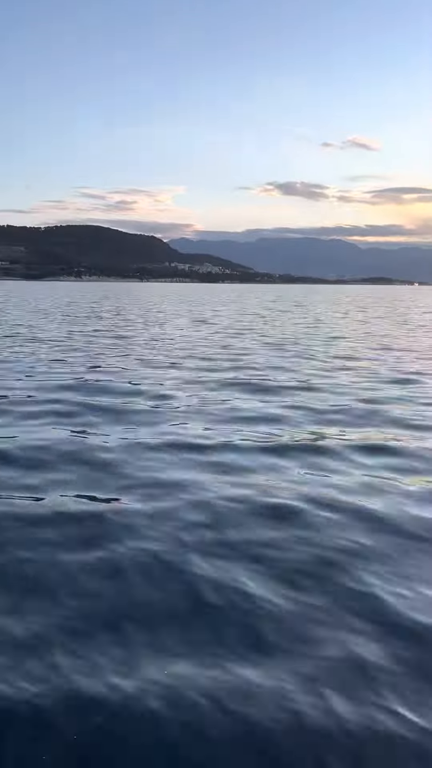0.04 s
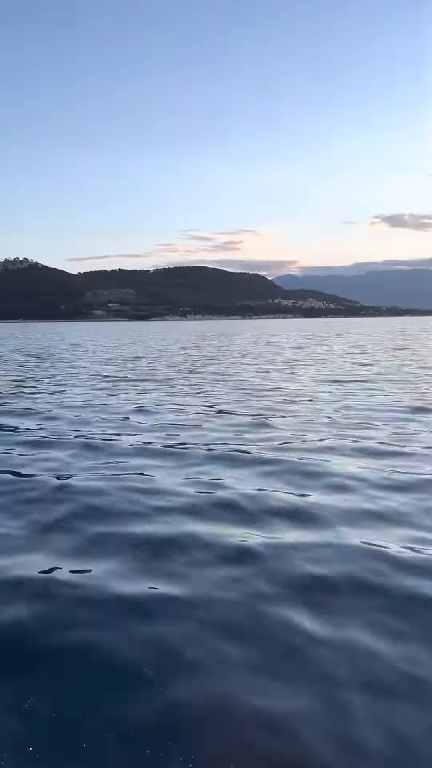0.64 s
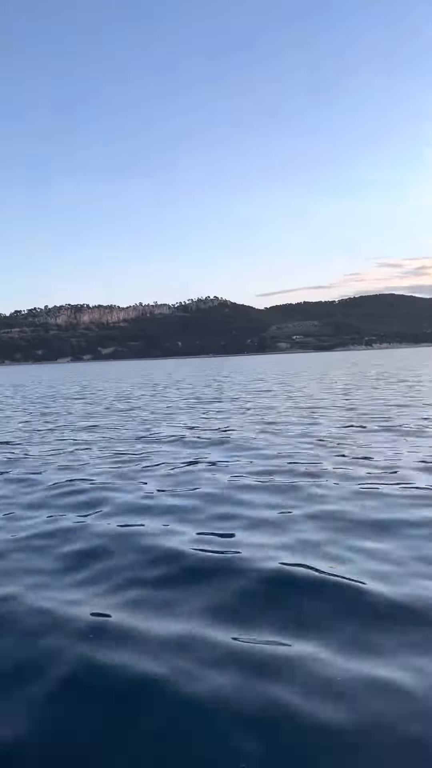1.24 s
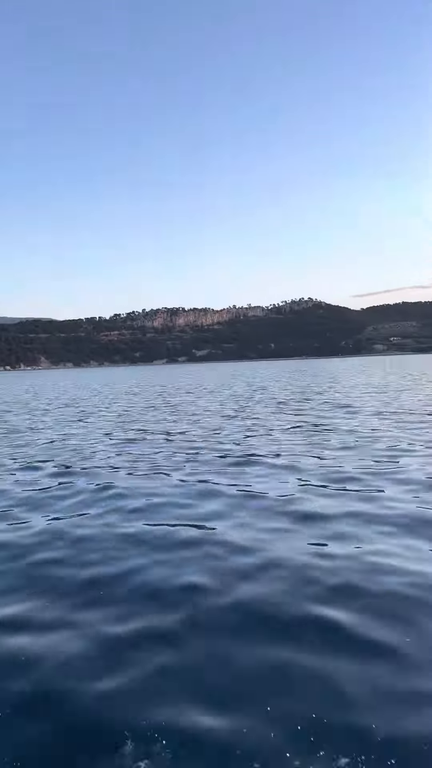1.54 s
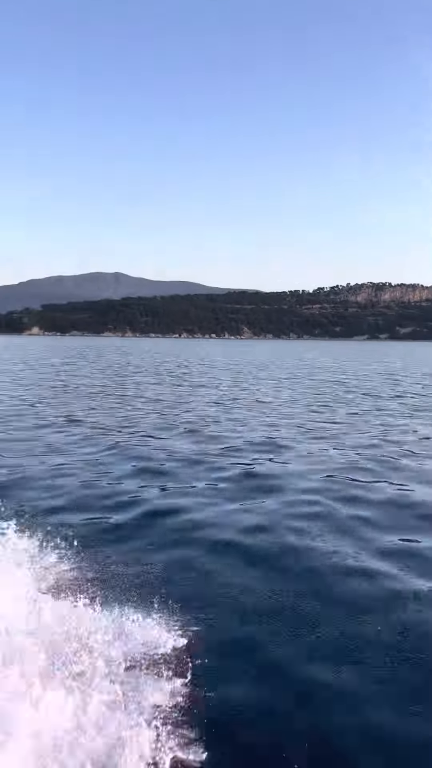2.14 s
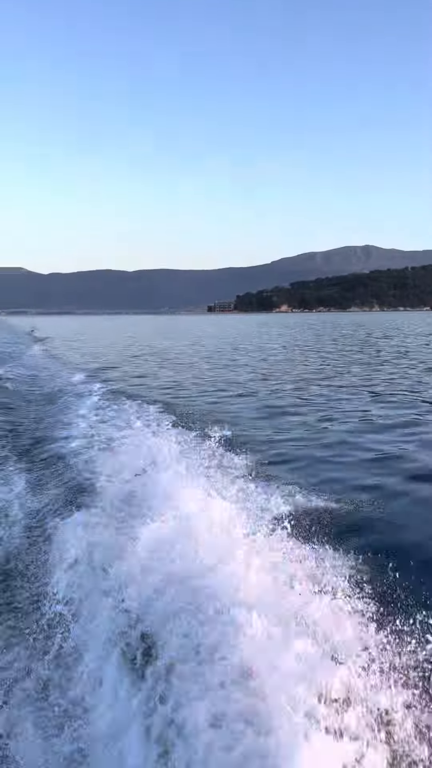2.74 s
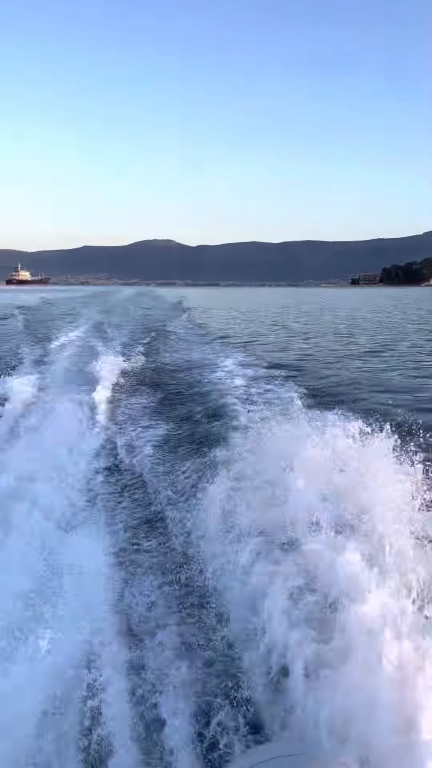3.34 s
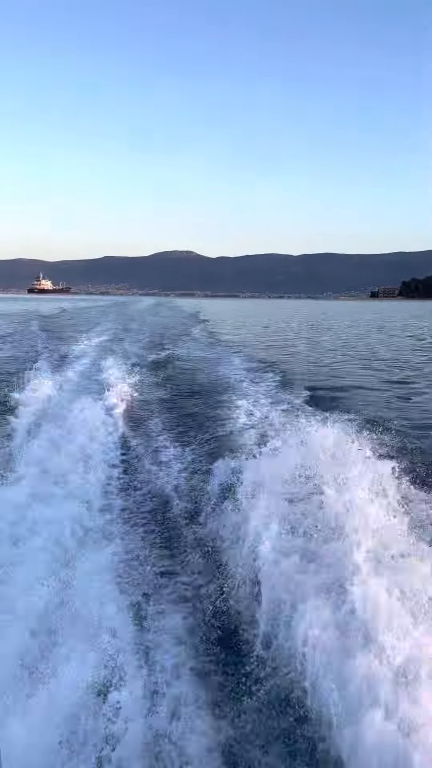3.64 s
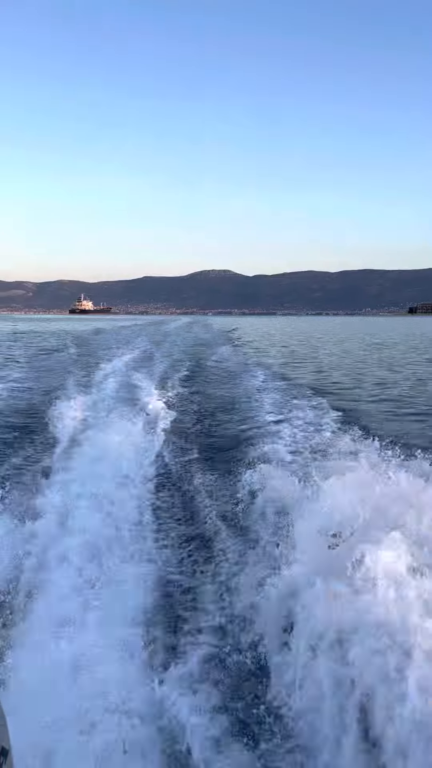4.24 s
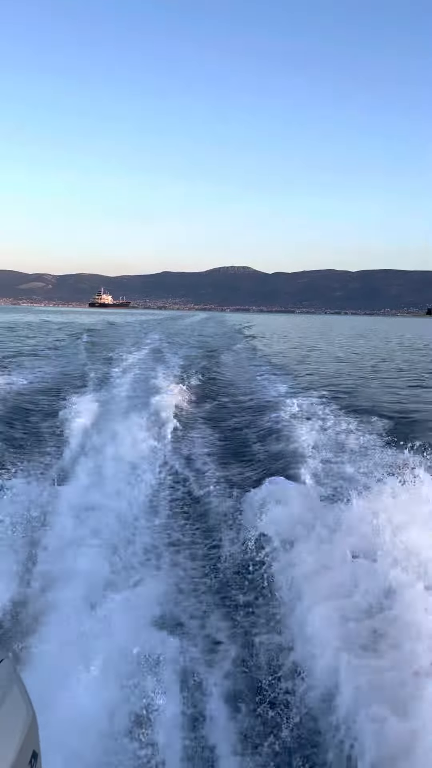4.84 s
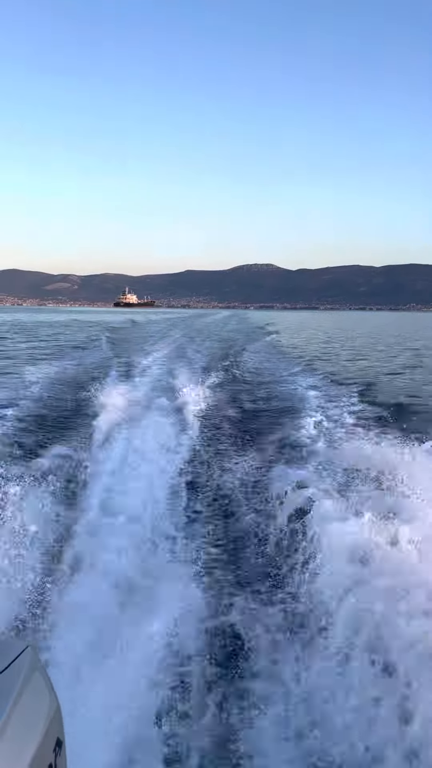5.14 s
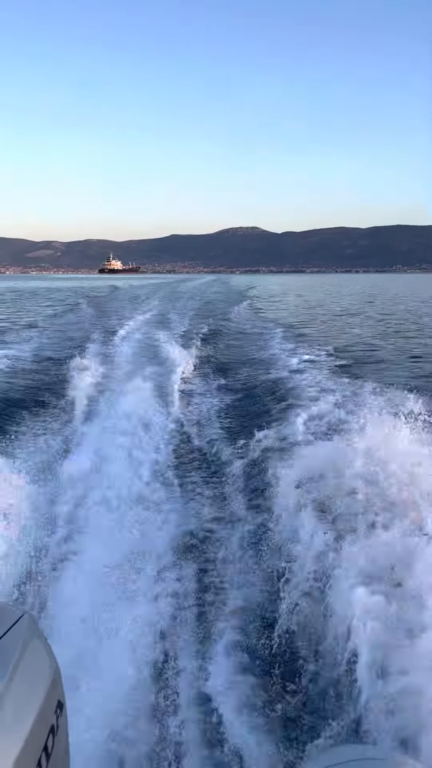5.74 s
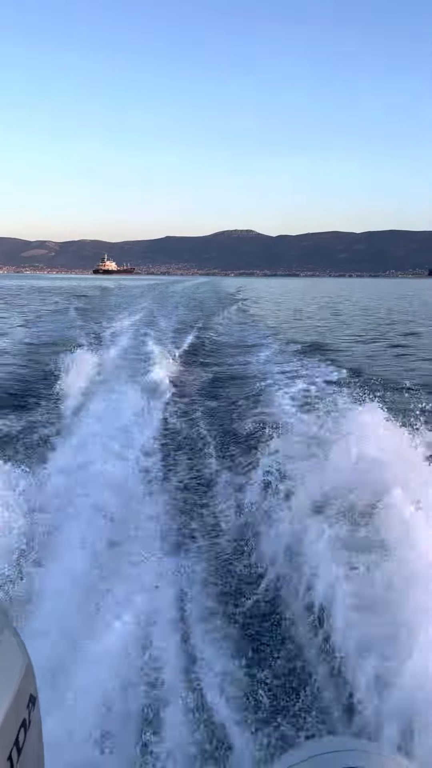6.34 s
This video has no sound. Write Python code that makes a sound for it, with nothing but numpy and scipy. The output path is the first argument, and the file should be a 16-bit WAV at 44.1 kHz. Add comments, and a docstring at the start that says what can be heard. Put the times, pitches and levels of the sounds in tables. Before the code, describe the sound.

Soft swishes sinking in pitch and rushing water surround the even hum of an outboard motor, heard from the moving boat. A wave thuds briefly against the hull. Then a few pops of air hit the microphone and a strong gust follows, with deep rumbling, flapping and crackling. The wind keeps buffeting to the end, while the motor drones on a little quieter and spray hisses and patters faintly.

```python
"""A four-cylinder outboard motor drones at its firing rate, driving a boat steadily over open water.
Water washes along the hull and knocks on a panel; spray hisses and drops splash.
We listen from on board through a microphone with two close openings, its left and right ports.
Early swishes sink in pitch, probably air sweeping over it. After three seconds it turns backward
into the slipstream, the air rushing past the boat, and wind rumbles, flaps and crackles on it."""
import sys
import numpy as np
from scipy import signal
from scipy.fft import rfft, irfft, next_fast_len
from scipy.io import wavfile
from scipy.ndimage import map_coordinates

SR = 44100
rng = np.random.default_rng(int(sys.argv[2]) if len(sys.argv) > 2 else 0)


def output_pcm(signal):
    """Save a mono or channel-first signal as 16-bit PCM at the path in sys.argv[1].

    Samples are clipped to [-1, 1] before scaling.
    """
    pcm = np.clip(np.atleast_2d(signal).T, -1, 1) * 32767
    wavfile.write(sys.argv[1], SR, np.round(pcm).astype(np.int16))


N = 291501
TIME = np.arange(N) / SR
FFT_SIZE = next_fast_len(N + SR // 4, real=True)
HZ = np.maximum(np.arange(FFT_SIZE // 2 + 1) * SR / FFT_SIZE, 1)


def from_db(db):
    """Turn decibels into a number to multiply a sound by."""
    return 10 ** (np.asarray(db) / 20)


def unit_level(x):
    """Scale a signal so that its average power is 1."""
    return x / np.sqrt(np.mean(x ** 2) + 1e-20)


def over_time(rows):
    """Join a table's rows with straight lines: one curve for each column after the time."""
    times, *columns = np.transpose(rows)
    return [np.interp(TIME, times, column) for column in columns]


def over_pitch(rows):
    """Join a table's rows with straight lines, giving every octave equal room."""
    hz, value = np.transpose(rows)
    return np.interp(np.log(HZ), np.log(hz), value)


def drift(per_s):
    """A smooth random wobble, about 1 in size, that changes about per_s times a second."""
    knots, coarse = rng.standard_normal(N // 16), TIME[::16]
    wobble = map_coordinates(knots, [coarse * per_s], order=2, mode="wrap")
    return np.interp(TIME, coarse, unit_level(wobble))


def white():
    """Two unrelated white noises."""
    return rng.standard_normal((2, N))


def clicks(per_s, spread_db):
    """Two streams of random clicks of uneven size and sign."""
    hits = rng.random((2, N)) < per_s / SR
    size = rng.exponential(1, (2, N))[hits]
    sign = np.sign(rng.random((2, N))[hits] - .5)
    out = np.zeros((2, N))
    out[hits] = sign * from_db(spread_db * np.minimum(size, 3))
    return unit_level(out)


def tone_filter(tone):
    """Make a filter from a tone table (a balance of lows and highs); it rings after a hit, never before."""
    cepstrum = irfft(np.log(from_db(over_pitch(tone))), FFT_SIZE)
    cepstrum[1:FFT_SIZE // 2] *= 2
    cepstrum[FFT_SIZE // 2 + 1:] = 0
    return np.exp(rfft(cepstrum))


def add(track, start_s, sound, peak_db):
    """Mix a short sound into a track at the given time and peak level."""
    start = int(start_s * SR)
    track[..., start:start + sound.shape[-1]] += (
        from_db(peak_db) * sound[..., :N - start] / np.abs(sound).max())


# How much of a sound the two ports have in common: pitch_hz, share_0_to_1
PORT_LIKENESS = [(200, 0.99), (400, 0.96), (700, 0.91), (1100, 1), (1500, 0.08), (2000, 0.1), (2600, 0.7),
                 (4000, 0.6), (5000, 1), (6300, 0.96), (8000, 1)]

def at_ports(pair, tone, lag_above_hz, lag_s=.000243):
    """Shape two noises into stereo: the ports share the bass, and the highs reach the right one later."""
    common, apart = rfft(pair, FFT_SIZE) * tone_filter(tone)
    alike = np.clip(over_pitch(PORT_LIKENESS), 0, 1)
    mid, side = np.sqrt(1 + alike) * common, np.sqrt(1 - alike) * apart
    highs = 1 / (1 + (lag_above_hz / HZ) ** 8)
    delay = np.exp(-2j * np.pi * HZ * lag_s * highs)
    return unit_level(irfft([mid + side, (mid - side) * delay], FFT_SIZE)[:, :N])


# How fast the engine fires: time_s, firings_per_s
FIRING_RATE = [(0, 153.1), (2.3, 152.9), (2.7, 153.9), (3.8, 153.2), (4.9, 154.0), (6.61, 153.8)]
# The exhaust drone as the microphone swings past the motor: time_s, level_db
DRONE_LEVELS = [(0, -21), (.08, -19), (.28, -15), (.38, -20.5), (.55, -15), (.85, -20), (.95, -15.5),
                (1.6, -13), (3.08, -11.5), (3.42, -23), (3.69, -15.5), (3.94, -21.5), (4.04, -15.5),
                (4.2, -17), (4.27, -22), (5.75, -22), (6.06, -18.5), (6.16, -23.5), (6.61, -19.5)]
# Gear whine, coming and going as the motor turns to and from the microphone: time_s, level_db
WHINE_LEVELS = [(.5, -68), (.8, -48), (1.1, -59.5), (1.35, -53.5), (1.55, -57), (1.72, -51.5),
                (1.95, -60.5), (2.33, -49.5), (2.7, -54.5), (3.4, -52), (4.0, -55), (4.25, -50.5),
                (5.7, -53.5), (6.61, -51)]
# Weaker engine tones, heard from the side and from behind: cycles_per_crank_turn, side_db, behind_db
ENGINE_TONES = [(3, -47.5, -63), (4, -40.5, -46.5), (5, -48.5, -62.5), (6, -50.5, -56.5), (8, -52, -51.5),
                (9, -60.5, -47.5), (12, -62.5, -46), (14, -56.5, -46.5), (17, -68, -57)]
# Tones of the drive that fall between the engine's: cycles_per_crank_turn, level_db
BETWEEN_TONES = [(3.445, -36), (6.47, -47.5), (8.51, -49.5)]

def engine(flutter_db=0.64, wind_flutter_db=0.65, waver_radians=0.72, drone_trim_db=-0.28):
    """Two firings per crank turn make an almost pure drone; weak tones and a rough gear whine join it."""
    firing_hz, = over_time(FIRING_RATE)
    drone_db, = over_time(DRONE_LEVELS)
    whine_db, = over_time(WHINE_LEVELS)
    crank_angle = np.pi * np.cumsum(firing_hz) / SR
    facing_away = np.clip((1.0 - TIME) / 0.18, 0, 1)   # at first the microphone faces away from the motor
    facing_back = np.clip((TIME - 2.6) / 0.41, 0, 1)   # later it swings towards the wake
    wobble_db = flutter_db * drift(60) + facing_back * wind_flutter_db * drift(20)
    drone = from_db(drone_db + drone_trim_db + wobble_db) * np.sin(2 * crank_angle)
    rattle = .9 * drift(45) + .6 * drift(260)
    tones = from_db(whine_db + 2.5 * drift(30)) * np.sin(24 * crank_angle + rattle)   # the gear whine
    for cycles, side_db, behind_db in ENGINE_TONES:
        gain = from_db(side_db + facing_back * (behind_db - side_db) + 2.1 * drift(18))
        tones += gain * np.sin(cycles * crank_angle + waver_radians * drift(25))
    for cycles, level_db in BETWEEN_TONES:
        gain = from_db(level_db - 7 * facing_back + 1.7 * drift(12))
        tones += gain * np.sin(cycles * crank_angle + waver_radians * drift(25))
    return np.sqrt(2) * (drone + from_db(-9 * facing_away) * tones)


# Water along the hull, duller where the bow wave is smooth: time_s, level_db, treble_change_db
WASH_LEVELS = [(0, -38.5, 6.5), (.5, -30.5, -8.5), (1.0, -32.5, 0), (1.55, -33.5, -1.5), (1.9, -29, -4.5),
               (2.3, -33, 3.5), (2.9, -24.5, -2.5), (3.4, -31, 0.5), (6.61, -37.5, 5)]
# The tone of that water: pitch_hz, relative_db
WASH_TONE = [(50, -27.5), (110, 4), (200, 2), (300, -1), (420, -5.5), (600, -7), (800, -11.5), (1100, -15),
             (1500, -22.5), (1900, -21), (2400, -26.5), (5000, -41.5), (12000, -65.5)]

def wash(churn_db=2.5, treble_hz=750):
    """Countless bubbles merge into a churning rush along the hull."""
    level_db, treble_db = over_time(WASH_LEVELS)
    bubbles = white() + .6 * clicks(per_s=2500, spread_db=3)
    rush = at_ports(bubbles, WASH_TONE, lag_above_hz=710)
    lows = signal.sosfiltfilt(signal.butter(2, treble_hz, fs=SR, output="sos"), rush)
    highs = from_db(treble_db) * (rush - lows)
    return from_db(level_db + churn_db * drift(70)) * (lows + highs)


# Swishes, probably air sweeping over the turning microphone; the first row is a brief burst of noise
# at the very start: loudest_s, pitch_hz, level_db, half_length_s
SWISHES = [(0.008, 995, -15.5, 0.015), (0.387, 820, -30.5, 0.3), (0.579, 797, -26, 0.022),
           (0.631, 724, -23.5, 0.026), (0.768, 578, -25, 0.07), (0.79, 900, -26, 0.0094),
           (0.826, 900, -22.5, 0.009), (0.924, 773, -26, 0.0095), (1.06, 950, -30.5, 0.014),
           (1.172, 525, -32, 0.13), (1.368, 327, -31.5, 0.1), (2.676, 758, -26, 0.012)]

def swish_curves(sink_octaves_per_s=0.28):
    """Pitch and level of the swishes: each swells, fades and sinks in pitch; the loudest leads."""
    power, octave_sum = 0, 0
    for loudest_s, pitch_hz, level_db, half_length_s in SWISHES:
        offset_s = TIME - loudest_s
        swish_power = from_db(level_db) ** 2 / (1 + (offset_s / half_length_s) ** 2 / 2) ** 3
        sinking_hz = np.maximum(pitch_hz * 2 ** (-sink_octaves_per_s * offset_s), 280)
        power += swish_power
        octave_sum += swish_power * np.log2(sinking_hz)
    return 2 ** (octave_sum / power), 10 * np.log10(power)


# The rasp on top of the swishes: pitch_hz, relative_db
RASP_TONE = [(600, -10), (1400, 3), (2200, 1.5), (2700, -17), (6000, -28.5)]

def swish(width_octaves=0.57, patchy_db=3.0, rasp_db=-13, rasp_db_per_octave=9):
    """A band of grainy noise swells, fades and sinks in pitch, with a rasp that comes in spurts."""
    centre_hz, level_db = swish_curves()
    ringing, power = 0, 0
    for hz in np.geomspace(230, 2300, 14):
        band = signal.butter(1, [hz * .92, hz * 1.08], "band", fs=SR, output="sos")
        gain = np.exp(-.5 * (np.log2(hz / centre_hz) / width_octaves) ** 2)
        gain += from_db(-23) * centre_hz / hz   # far-off pitches still ring faintly
        patches = from_db(patchy_db * drift(35.1))
        ring = signal.sosfilt(band, clicks(per_s=900, spread_db=3.7) + 1e-18)
        ringing += gain * patches * unit_level(ring)
        power += gain ** 2
    # pitch_hz, relative_db
    body_tone = [(100, -27.0), (250, 5.5), (1400, -1), (2200, -8), (2800, -21), (6000, -36)]
    body = at_ports(ringing / np.sqrt(power), body_tone, lag_above_hz=1260)
    spurts = (white() + clicks(per_s=1200, spread_db=2)) * from_db(3 * drift(90))
    rasp_gain = from_db(rasp_db + rasp_db_per_octave * np.log2(centre_hz / centre_hz.max()))
    rasp = rasp_gain * at_ports(spurts, RASP_TONE, lag_above_hz=1250)
    return from_db(level_db) * (body + rasp)


# How the spray rises and falls: time_s, relative_db
SPRAY_LEVELS = [(0.05, -62.5), (0.54, -54.5), (0.69, -61), (1.31, -62.5), (1.47, -56.5), (1.83, -53.5),
                (1.9, -57.5), (5.69, -56.5), (6.5, -57)]
# The tone of its hiss: pitch_hz, relative_db
SPRAY_TONE = [(600, -18), (2000, 0.5), (3200, 2.5), (5000, 2), (6500, 2.5), (9000, -1), (12500, -2.5),
              (15500, -4)]

def spray(flicker_db=1.08, boost_db=7.5):
    """Fine droplets fall back as a smooth hiss."""
    level_db, = over_time(SPRAY_LEVELS)
    drops = (white() + 0.44 * clicks(per_s=2500, spread_db=6.1)) * from_db(flicker_db * drift(37))
    return from_db(level_db + boost_db) * at_ports(drops, SPRAY_TONE, lag_above_hz=1200)


# Gusts and lulls in the slipstream: time_s, flow_change_db, half_length_s
GUSTS_AND_LULLS = [(3.765, 2.5, 0.068), (3.95, 5.5, .07), (4.066, -20, 0.027), (4.159, -21, 0.015),
                   (4.315, 7, 0.16), (4.545, 5, 0.033), (4.785, 12, 0.02), (4.86, 7.5, 0.033),
                   (5.163, 10, 0.067), (5.265, 8.5, 0.028), (5.727, -11, 0.035), (5.974, 4, 0.61),
                   (6.3, 3, 0.028), (6.586, 3, 0.034)]

def airflow(turn_s=2.99, turn_length_s=0.1, peak_db=14.5, settle_s=0.68, wander_db=0.5):
    """Turning into the wind brings a blast that settles. Gives exposure (0-1) and dB above steady flow."""
    exposed = np.clip((TIME - turn_s) / turn_length_s, 0, 1)
    blast_db = peak_db * np.clip(1 - (TIME - turn_s - turn_length_s) / settle_s, 0, 1)
    gusts_db = sum(change_db * np.exp(-((TIME - time_s) / half_length_s) ** 2)
                   for time_s, change_db, half_length_s in GUSTS_AND_LULLS)
    return exposed, blast_db + gusts_db + wander_db * drift(25)


# Wind rumble in shelter, rising as the microphone begins to turn: time_s, relative_db
SHELTERED_LEVELS = [(0, -26), (.9, -32.5), (1.55, -40), (2.15, -35.5), (2.45, -44), (3.0, -28)]
# The tone of the rumble: pitch_hz, relative_db
RUMBLE_TONE = [(12, -35.5), (25, -10.5), (40, 5), (58, 12.5), (100, 11), (160, 7), (260, -3.5),
               (600, -63.5)]

def rumble(exposed, flow_db, lumpy_db=2.1, steady_db=-26, shelter_cut_hz=72):
    """Big swirls of air press on both ports at once: hard in the open, fainter and less deep in shelter."""
    sheltered_db, = over_time(SHELTERED_LEVELS)
    swirls = rng.standard_normal(N) * from_db(lumpy_db * drift(30))
    pressure = unit_level(irfft(rfft(swirls, FFT_SIZE) * tone_filter(RUMBLE_TONE), FFT_SIZE)[:N])
    bass_cut = signal.butter(2, shelter_cut_hz, "high", fs=SR, output="sos")
    sheltered = from_db(sheltered_db) * signal.sosfilt(bass_cut, pressure)
    in_the_open = from_db(steady_db + 0.3 * flow_db) * pressure
    return (1 - exposed) * sheltered + exposed * in_the_open


# A brief, bright burst of noise at the very start, the sharp crack of a wind slap on the microphone
# at 6.284 and 6.285 s, and otherwise splashing drops: start_s, relative_peak_db, decay_s, pitch_hz
BRIGHT_BURSTS = [(.006, -26, 0.016, 3660), (.479, -36, 0.009, 3600), (2.276, -32, .003, 2580),
                 (3.077, -25, 0.0019, 3370), (3.277, -28, 0.0034, 3180), (3.533, -30, 0.0028, 3400),
                 (3.777, -22, 0.0016, 3000), (3.817, -31, .002, 3000), (3.947, -27.5, 0.0014, 4400),
                 (4.113, -28, 0.0025, 2900), (4.255, -21, 0.005, 2950), (4.462, -27.5, 0.0024, 3040),
                 (4.625, -31, 0.0033, 2900), (4.644, -25.5, 0.0044, 2940), (5.156, -31, 0.0035, 2900),
                 (5.176, -27, 0.0031, 2900), (5.668, -28, 0.0093, 3070), (6.057, -25, 0.0027, 2800),
                 (6.285, -15, .0008, 1720), (6.284, -23, .0008, 4400), (6.291, -25, 0.0046, 2900),
                 (6.361, -30, .008, 4000), (6.55, -29, 0.0089, 3400)]
# The tone of their ticks: pitch_hz, relative_db
BURST_TONE = [(500, -12.5), (1500, 15), (3000, 0), (4400, -1.5), (5600, -9.5), (8000, -19)]

def bright_bursts(width_octaves=0.35, trim_db=-0.5):
    """Short bursts of hiss and sharp ticks, each around its own pitch, die away quickly."""
    out, age = np.zeros((2, N)), TIME[:SR // 10]
    ticks = at_ports(white() + .6 * clicks(per_s=1800, spread_db=3), BURST_TONE, lag_above_hz=1250)
    for start_s, peak_db, decay_s, pitch_hz in BRIGHT_BURSTS:
        edges_hz = [pitch_hz / 2 ** width_octaves, pitch_hz * 2 ** width_octaves]
        band = signal.butter(2, edges_hz, "band", fs=SR, output="sos")
        piece = np.roll(ticks, -int(start_s * SR), axis=1)[:, :len(age)]
        burst = piece * np.sqrt(age) * np.exp(-age / decay_s)
        add(out, start_s, signal.sosfilt(band, burst), peak_db + trim_db)
    return out


# Pockets of air under the curling bow wave: start_s, end_s, start_pitch_hz, start_level_db
AIR_POCKETS = [(.605, 0.848, 514.5, -26.5), (1.026, 1.273, 470, -32.5)]

def air_pockets(flicker_per_s=110, sink_octaves_per_s=2.8, fade_db_per_s=19.5, ramp_s=0.01):
    """Bursting bubbles keep the air under the wave ringing; its pitch sinks as the pocket grows."""
    out = np.zeros(N)
    for start_s, end_s, pitch_hz, level_db in AIR_POCKETS:
        age = np.clip(TIME - start_s, 0, end_s - start_s)
        phase = 2 * np.pi * np.cumsum(pitch_hz * 2 ** (-sink_octaves_per_s * age)) / SR
        ring = unit_level(drift(flicker_per_s) * np.sin(phase) + drift(flicker_per_s) * np.cos(phase))
        on_off = np.clip(np.minimum(age, end_s - TIME) / ramp_s, 0, 1)
        out += from_db(level_db - fade_db_per_s * age) * on_off * ring
    return out


# A wave knocks on the hull twice in quick succession: start_s, peak_db
WAVE_KNOCKS = [(1.808, -8), (1.8136, -17)]
# The notes a hull panel rings at: pitch_hz, relative_db, ring_s (time to fade by 60 dB)
PANEL_NOTES = [(301, 6.5, 0.019), (422, 2, 0.022), (640, -10, 0.025)]

def hull_knock(contact_s=0.0022, soft_hz=800):
    """Water is a soft hammer: the panel answers with a short hollow thud."""
    out, age = np.zeros(N), TIME[:SR // 10]
    ring = sum(from_db(level_db - 60 * age / ring_s) * np.sin(2 * np.pi * pitch_hz * age)
               for pitch_hz, level_db, ring_s in PANEL_NOTES)
    soft_start = 1 - np.exp(-age / contact_s)
    thud = signal.sosfilt(signal.butter(4, soft_hz, fs=SR, output="sos"), ring * soft_start)
    for start_s, peak_db in WAVE_KNOCKS:
        add(out, start_s, -thud, peak_db)
    return out


# Single slaps of wind on the ports: start_s, pop_db, pop_pitch_hz, relative_thump_db
WIND_SLAPS = [(2.634, -13.5, 520, -23), (2.669, -4.5, 295, -14), (2.719, -12.5, 606, -22),
              (2.976, -14, 522, -22), (3.028, -9, 606, -15.5), (3.064, -11.5, 720, -21),
              (3.077, -1.5, 420, -18), (3.09, -6, 431, -26), (3.116, -7.5, 441, -29),
              (3.13, -5.5, 650, -25), (3.161, -8.5, 764, -16.5), (3.17, -6.5, 417, -24),
              (3.186, -7.5, 600, -24), (3.211, -16, 950, -33), (3.248, -10, 680, -28),
              (3.28, -7.5, 905, -23), (3.321, -12, 1000, -30), (3.392, -15, 480, -24),
              (3.534, -15.5, 900, -30), (3.6, -14.5, 650, -26), (3.625, -16.5, 503, -16.5),
              (3.863, -12, 850, -18), (4.007, -13, 660, -20), (4.258, -15, 550, -27),
              (4.314, -14, 650, -28), (4.334, -11, 676, -25), (4.358, -15.5, 650, -32),
              (4.381, -15.5, 700, -38), (4.438, -14.5, 825, -38), (4.501, -19.5, 945, -42),
              (4.55, -21, 700, -36), (4.647, -12.5, 800, -30), (4.746, -18, 850, -21),
              (4.763, -18, 620, -24), (4.787, -14, 890, -26), (4.907, -14, 1100, -39),
              (4.985, -17, 1020, -40), (5.154, -13, 600, -32), (5.179, -16, 800, -34),
              (5.242, -15, 900, -19), (5.267, -15, 720, -32), (5.299, -16, 550, -34),
              (5.331, -14.5, 804, -26), (5.584, -15.5, 850, -37), (5.668, -18, 764, -45),
              (5.921, -17.5, 850, -34), (5.965, -16, 650, -30), (6.2845, -10, 870, -16),
              (6.334, -14.5, 1080, -24), (6.557, -12, 690, -24)]
# The tone of wind crackle, here and in the slipstream: pitch_hz, relative_db
CRACKLE_TONE = [(500, -25), (1500, 10), (2300, 2), (3300, -3), (5000, -11.5), (6500, -8.5), (9000, -39)]

def wind_slaps(exposed, swell_cycles=1.2, sag=0.27, crack_s=0.0021, thump_boost_db=5, crack_db=-28.5):
    """A strong swirl gives a pop that swells, sags in pitch and stops short, a low thump and a crack."""
    out, age = np.zeros((2, N)), TIME[:SR // 20]
    thump = irfft(tone_filter(RUMBLE_TONE), FFT_SIZE)[:len(age)]
    crackle = irfft(tone_filter(CRACKLE_TONE), FFT_SIZE)[None, :len(age)]
    bursts = rng.standard_normal((len(WIND_SLAPS), 2, len(age))) * np.sqrt(age) * np.exp(-age / crack_s)
    for (start_s, pop_db, pitch_hz, thump_db), burst in zip(WIND_SLAPS, bursts):
        shelter_db = -8 * (1 - exposed[int(start_s * SR)])
        cycles = np.log1p(sag * pitch_hz * age) / sag
        progress = (pitch_hz * age / swell_cycles) ** 2
        pop = np.sin(2 * np.pi * cycles) * progress * np.exp(-progress)
        add(out, start_s, -pop, pop_db)
        add(out, start_s, -thump, thump_db + thump_boost_db)
        add(out, start_s, signal.fftconvolve(burst, crackle), pop_db + crack_db + shelter_db)
    return out


# The tone of flapping wind: pitch_hz, relative_db
FLAP_TONE = [(40, -6.5), (120, -7.5), (230, 3), (400, 4.5), (700, 1), (1100, -0.5), (1500, -10),
             (2100, -24), (3500, -50), (8000, -71.5)]
# The tone of a strong blast's deep roar: pitch_hz, relative_db
ROAR_TONE = [(50, -48), (130, 1.5), (220, 0.5), (380, -1), (550, -8), (1000, -22), (3000, -60)]

def slipstream(exposed, flow_db, clump_db=3.0, flap_db=-32.5, crackle_db=-43.0, roar_db=-45.5):
    """Small swirls break on the ports in clumps, each a dull pop with a fizz of crackle."""
    clumps = drift(110)
    pops = (clicks(per_s=330, spread_db=0.7) + 0.45 * white()) * from_db(clump_db * clumps)
    fizz = (white() + .5 * clicks(per_s=1500, spread_db=3)) * from_db(1.2 * clumps + 3.2 * drift(70))
    flapping = from_db(0.59 * flow_db + flap_db) * at_ports(pops, FLAP_TONE, lag_above_hz=1200)
    crackle = from_db(0.24 * flow_db + crackle_db) * at_ports(fizz, CRACKLE_TONE, lag_above_hz=1210)
    # the roar grows with the square of the flow, so it stands out only in the strongest blasts
    roar = from_db(2 * flow_db + roar_db) * at_ports(white(), ROAR_TONE, lag_above_hz=1280)
    return exposed ** 2 * (flapping + crackle + roar)


# Wind strikes the two ports unequally: pitch_hz, left_minus_right_db
WIND_BALANCE = [(220, 0), (380, -0.5), (650, 3), (1150, 3.5), (2100, -4.5), (3800, 1)]

def wind():
    """One airflow drives rumble, slipstream and slaps; only the rumble is the same at both ports."""
    exposed, flow_db = airflow()
    lows = rumble(exposed, flow_db)
    flurry = slipstream(exposed, flow_db) + wind_slaps(exposed)
    balance = from_db(over_pitch(WIND_BALANCE) * np.array([[.5], [-.5]]))
    return lows + irfft(rfft(flurry, FFT_SIZE) * balance, FFT_SIZE)[:, :N]


def spatter(level_db=-52, decay_s=0.0054):
    """Behind the boat, stray drops patter softly on the wake one by one."""
    exposed, _ = airflow()
    landings = np.abs(clicks(per_s=30, spread_db=2)[0])
    bursts = unit_level(signal.lfilter([1], [1, -np.exp(-1 / (decay_s * SR))], landings + 1e-18))
    # pitch_hz, relative_db
    drop_tone = [(1200, -6), (2500, -0.5), (3600, -0.5), (5000, -12.0), (7000, -29)]
    return exposed * from_db(level_db) * bursts * at_ports(white(), drop_tone, lag_above_hz=1250)


def scene():
    """Engine, water and wind at the two ports."""
    return (engine() + wash() + swish() + air_pockets() + spray() + bright_bursts() + spatter()
            + hull_knock() + wind())


# Below this pitch, left and right become the same (mono): time_s, pitch_hz
MONO_BELOW = [(0, 960), (.6, 850), (1.1, 556), (1.7, 269), (3.0, 273), (3.6, 446), (5.4, 310), (6.61, 423)]
# How much the microphone widens the stereo by boosting left minus right: pitch_hz, boost_db
STEREO_BOOST = [(300, 6.5), (600, 4.5), (1200, 6.5), (2000, 1), (3200, 3.5), (4600, 6.5), (6500, -1)]

def record(dry, peak_limit=.95, cutoff_hz=14900):
    """The microphone makes the bass mono, widens the middle pitches, rounds peaks and cuts the top."""
    mid, side = dry.mean(axis=0), (dry[0] - dry[1]) / 2
    hz, times, frames = signal.stft(side, SR, nperseg=1024)
    edge_hz = np.interp(times, *np.transpose(MONO_BELOW))
    above_edge = 1 - 1 / (1 + (hz[:, None] / edge_hz) ** 10)
    width = from_db(np.interp(hz, HZ, over_pitch(STEREO_BOOST)))[:, None]
    side = signal.istft(frames * above_edge * width, SR)[1][:N]
    wide = np.array([mid + side, mid - side])
    rounded = wide / (1 + (wide / peak_limit) ** 8) ** (1 / 8)
    return signal.sosfilt(signal.ellip(10, .1, 80, cutoff_hz, fs=SR, output="sos"), rounded)


dry = scene()
out = record(dry)
output_pcm(out)
```